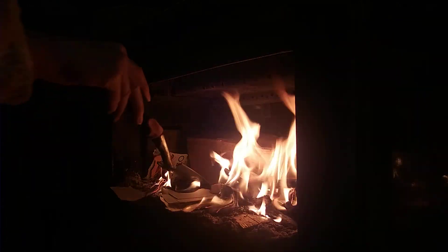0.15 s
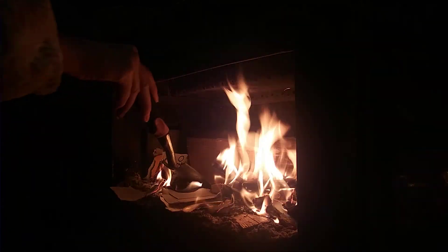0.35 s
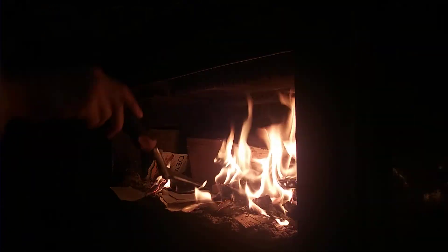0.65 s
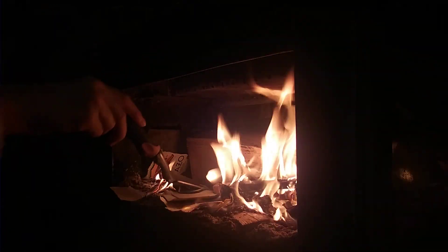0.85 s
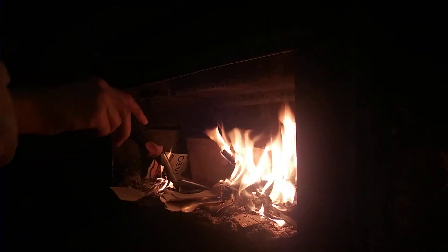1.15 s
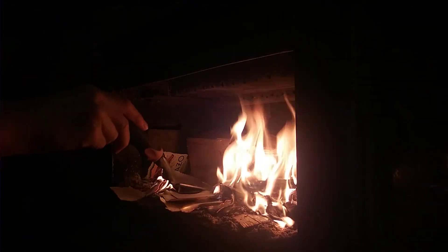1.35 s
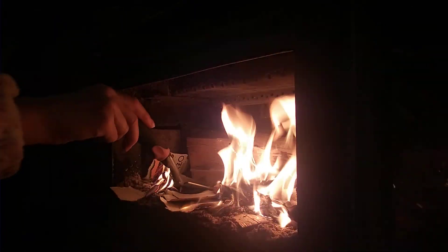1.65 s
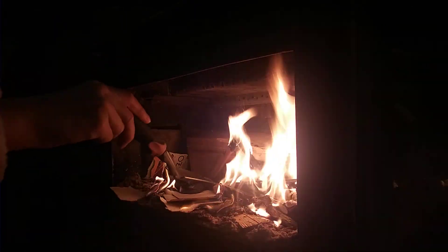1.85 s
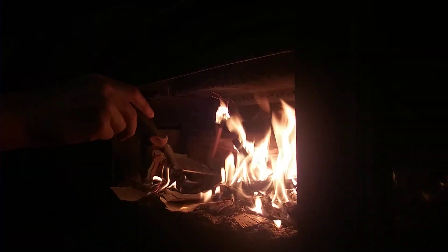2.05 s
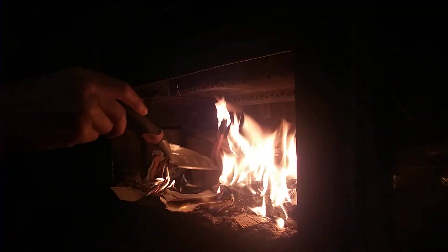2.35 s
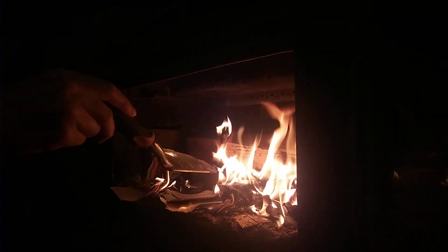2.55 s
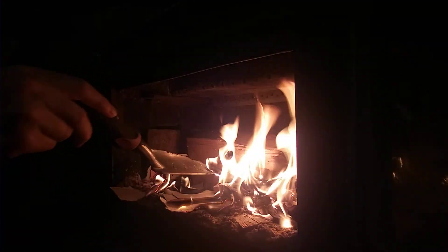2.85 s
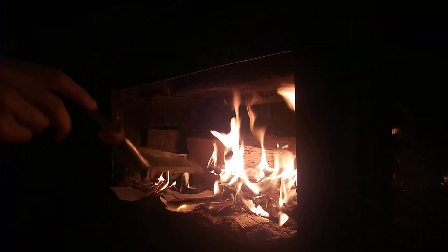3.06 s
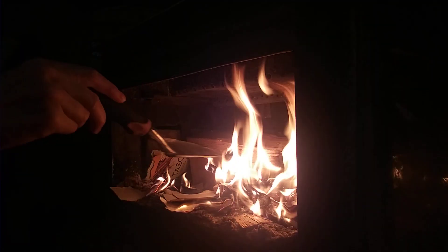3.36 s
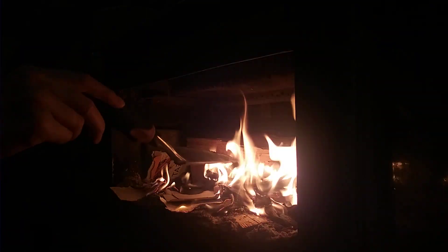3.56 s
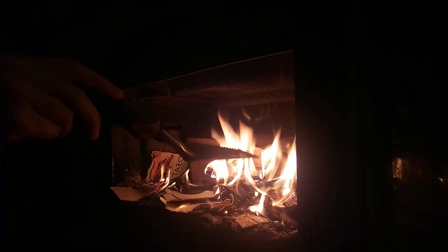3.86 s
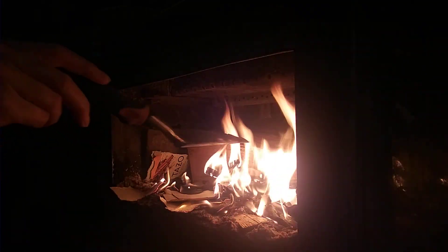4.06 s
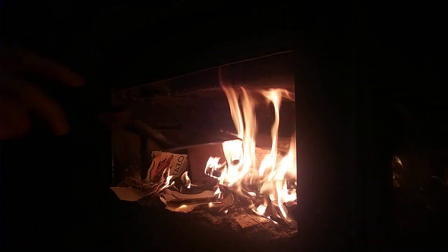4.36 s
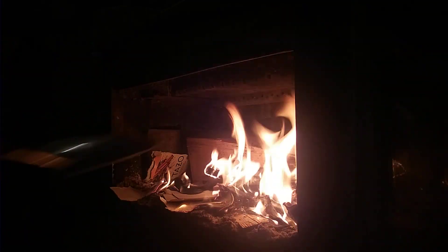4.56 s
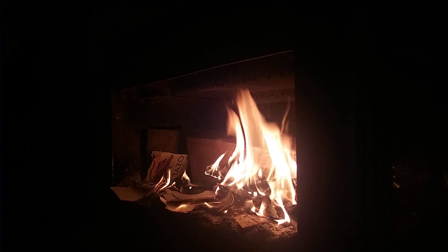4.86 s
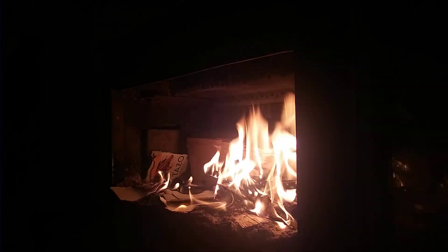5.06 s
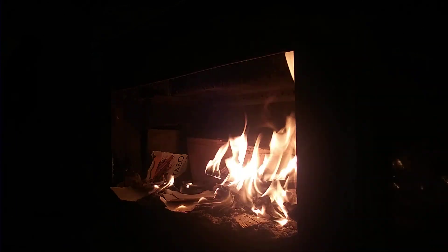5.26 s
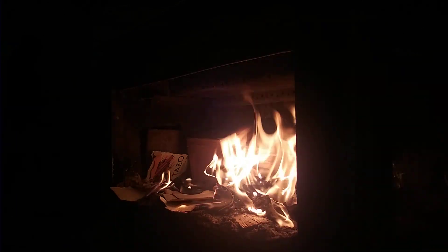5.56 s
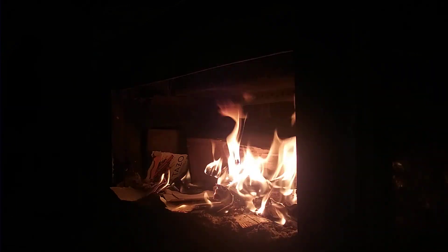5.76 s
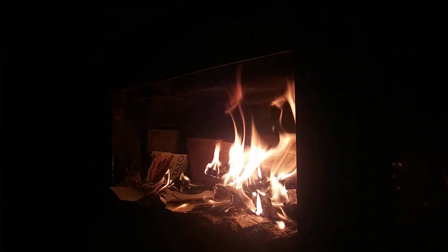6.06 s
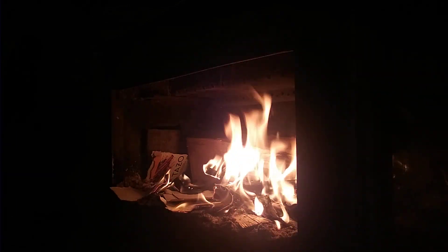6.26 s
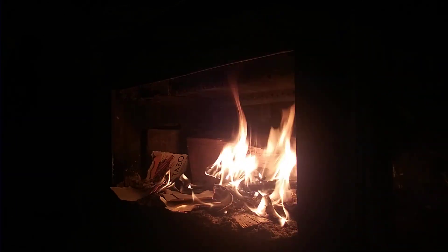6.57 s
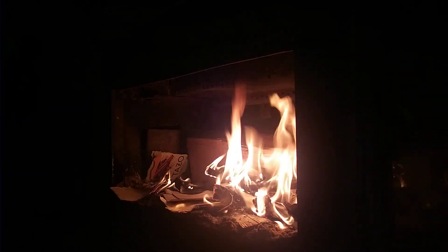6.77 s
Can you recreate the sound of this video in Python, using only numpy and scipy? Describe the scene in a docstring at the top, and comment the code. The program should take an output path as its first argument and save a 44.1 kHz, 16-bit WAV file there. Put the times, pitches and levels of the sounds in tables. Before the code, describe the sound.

A small paper fire murmurs and pops in an open wood stove. A steel shovel scrapes and crunches through paper and ash, its blade faintly singing, and knocks once on the iron door frame. It is then dropped on sheet metal with a loud clatter and boom, and its wooden handle rocks to rest. Kindling rustles at the end. The sound is close and bright, in a small room.

```python
"""Soft pops and papery scraping, then a loud metal clatter and boom, close by in a small room.
A small paper fire draws and pops in an open wood stove. A steel shovel pushes through paper and ash,
its blade singing with friction. It knocks the iron door frame, is dropped on sheet metal, and its
handle rocks to rest. Kindling is picked up at the end. The microphone has a bright treble peak."""
import sys
import numpy as np
from scipy import signal
from scipy.fft import rfft, irfft
from scipy.io import wavfile

SR = 44100
rng = np.random.default_rng(int(sys.argv[2]) if len(sys.argv) > 2 else 0)


def master_out(mix):
    """Clip the mix to full scale and print it as 16-bit PCM to the path in sys.argv[1]."""
    frames = np.transpose(np.atleast_2d(mix))
    ceiling = np.clip(frames, -1, 1)
    pcm = np.round(ceiling * 32767).astype(np.int16)
    wavfile.write(sys.argv[1], SR, pcm)


N = 305613
T = np.arange(N) / SR

# spectrum of a hard contact: f/Hz, level/dB
CLASH_SPECTRUM = [(60, -31.5), (150, -10.5), (280, -0.5), (600, 1), (1000, -4.5), (2000, -1.5), (4000, -4),
                  (6000, -5.5), (7500, -12.5), (11000, -12.5), (12500, -21), (16000, -28.5)]


def amp(db):
    """Decibels to gain."""
    return 10 ** (np.asarray(db) / 20)


def unit(x):
    """Scale to rms 1."""
    return x / np.sqrt(np.mean(x ** 2))


def fade(t, t60_s):
    """Exponential decay, 60 dB down after t60_s."""
    return np.exp(-np.minimum(np.log(1000) * t / t60_s, 20))


def add(out, start_s, x):
    """Mix x into out from start_s on."""
    i = max(int(start_s * SR), 0)
    out[i:i + len(x)] += x[:len(out) - i]


def colour(x, spectrum, tilt_db_oct=0):
    """Shape x with a spectrum (f/Hz, level/dB), tilted about 2 kHz."""
    hz, db = np.transpose(spectrum)
    octave = np.log2(np.maximum(np.fft.rfftfreq(len(x), 1 / SR), 1) / 2000)
    gain_db = np.interp(octave, np.log2(hz / 2000), db) + tilt_db_oct * octave
    return irfft(rfft(x) * amp(gain_db), len(x))


def band(x, lo_hz, hi_hz, order=2):
    """Causal band-pass."""
    sos = signal.butter(order, [lo_hz, hi_hz], "band", fs=SR, output="sos")
    return signal.sosfilt(sos, x + 1e-18)


def resonance(x, hz, width_hz):
    """One resonance, gain 1 at its centre."""
    return signal.lfilter(*signal.iirpeak(hz, hz / width_hz, fs=SR), x + 1e-18)


def walk(rate_hz):
    """Random wandering, spread near 1."""
    knots = rng.standard_normal(N // 20)
    return np.interp(T * rate_hz, np.arange(len(knots)), knots)


def crackle(rate_hz, spread_db):
    """Random clicks, most weak, a few strong; count capped at N / 8."""
    count = min(int(rate_hz * N / SR), N // 8)
    when, chance, side = rng.random((N // 8, 3))[:count].T
    size = amp(spread_db * np.minimum(-np.log(1 - chance), 3.5))
    return unit(np.bincount((when * N).astype(int), size * np.sign(side - .5), N))


def tick():
    """Instant of hard contact, peak 1."""
    click = band(signal.unit_impulse(SR // 50), 900, 5100, order=1)
    return click / abs(click).max()


def ring(modes, freedom=1):
    """Modes of a struck body, alternating in sign; pressed on another (freedom < 1) it dies sooner."""
    t = T[:3 * SR // 2]
    swing = sum((-1) ** k * amp(db) * fade(t, t60_s * freedom) * np.sin(2 * np.pi * hz * t)
                for k, (hz, db, t60_s) in enumerate(modes))
    return band(swing, 100, 20000)  # small bodies radiate no deep bass


def wash(spectrum, t60_s, damping, tilt_db_oct=0, buzz_db=0):
    """Dense weak modes as noise, grainy where metal buzzes; t60_s holds at 1 kHz, treble dies sooner."""
    chatter = rng.standard_normal(SR) * amp(buzz_db * walk(900)[:SR])
    bins = rfft(unit(colour(chatter, spectrum, tilt_db_oct)))
    octave = np.log2(np.clip(np.fft.rfftfreq(SR, 1 / SR), 125, 16000) / 1000)
    out = np.zeros(SR)
    for k in range(-3, 5):
        octave_band = irfft(bins * np.maximum(1 - abs(octave - k), 0), SR)
        out += octave_band * fade(T[:SR], t60_s / 2 ** (k * damping))
    return out


def fractures(breaks, grit_db, shower_db, low_db, middle_db):
    """Each break: one sharp crack and a fading shower of smaller ones, weighted in three bands."""
    out, t = np.zeros(N), T[:SR // 4]
    for start_s, db, body_db, t60_s in breaks:
        noise, grit = rng.standard_normal((2, len(t)))
        shower = noise * amp(grit_db * np.minimum(grit, 2)) * fade(t, t60_s)
        shower *= amp(shower_db) / np.linalg.norm(shower)
        shower[0] = 1  # the crack
        parts = band(shower, 205, 2660), band(shower, 1840, 7740), band(shower, 7300, 13340, order=1)
        gains = amp([body_db + low_db, body_db + middle_db, 0])
        snap = sum(gain * part / np.linalg.norm(part) for gain, part in zip(gains, parts))
        add(out, start_s, amp(db) * snap)
    return out


def effort(moves, grip_s=0.0099, release_t60_s=0.15):
    """Each movement takes hold, presses steadily harder or softer, and dies away as the hand stops."""
    out = np.zeros(N)
    for start_s, end_s, db, swell_db in moves:
        progress = np.clip((T - start_s) / (end_s - start_s), 0, 1)
        attack = np.clip((T - start_s) / grip_s, 0, 1)
        release = fade(np.maximum(T - end_s, 0), release_t60_s)
        out += amp(db + swell_db * (progress - .5)) * attack * release
    return out


def friction(resonances, density, jerk_db, shift_db, body_db):
    """Uneven grains, each size with its own pitch; resonances come and go as the contact moves."""
    # rubbed paper: f/Hz, level/dB
    paper_spectrum = [(150, -16), (500, 13), (800, -2.5), (1250, -3), (2200, 0.5), (4500, 3.5), (6500, 1),
                      (8000, -6.5), (11000, 1), (13000, -6), (16000, -4)]
    crumbs = np.zeros(N)
    for hz in np.geomspace(900, 15000, 22):
        clicks = crackle(density * hz / 60000, spread_db=4)
        crumbs += resonance(clicks, hz, hz / 14) * amp(3.5 * walk(35))
    grains = crackle(density, spread_db=4.5) + amp(1) * unit(crumbs)
    grains *= amp(jerk_db * walk(130))
    body = sum(amp(db + shift_db * walk(30)) * unit(resonance(grains, hz, 2 * half_width_hz))
               for hz, half_width_hz, db in resonances)
    return unit(unit(colour(grains, paper_spectrum)) + amp(body_db) * unit(body))


def room(x):
    """Quick firebox reflections, then the faint tail of a small room."""
    # firebox wall echoes: delay/s, level/dB
    walls = [(.0013, -27), (.0024, -23.5), (.0034, -19.5), (.0046, -23.5), (.0059, -23)]
    t = T[:SR // 2]
    tail = rng.standard_normal(len(t)) * (t > .004) * np.exp(-t / 0.035)
    echoes = amp(-13) * tail / np.linalg.norm(tail)
    for delay_s, db in walls:
        echoes[int(delay_s * SR)] += amp(db)
    echoes = band(echoes, 1200, 19000)  # the open firebox returns little bass
    return x + signal.fftconvolve(x, echoes)[:N]


def draught():
    """Air drawn through the firebox murmurs."""
    # air noise: f/Hz, level/dB
    spectrum = [(22, -86), (48, -44.5), (100, -33.5), (138, -26), (180, -34), (270, -40.5), (400, -39),
                (700, -47.5), (1100, -53.5), (2500, -59.5), (7000, -66), (15000, -70)]
    return colour(rng.standard_normal(N), spectrum) * amp(0.3 * walk(2.56))


def fire():
    """Burning paper: fine crackle and single pops, which set the microphone's treble resonance ringing."""
    # pops: t/s, level/dB, body re treble/dB, shower t60/s
    bursts = [(0.0589, -14.5, -14, 0.014), (0.2160, 2.5, -25.5, 0.0063), (1.1032, -5, -24, 0.0059),
              (1.4708, -13, -12.5, .009), (2.1357, -18, -24, 0.0076), (2.1655, -11, -23, 0.04),
              (3.2262, -8, -16, 0.02), (3.2287, -12.5, -16.5, 0.014), (4.1134, -36.5, -12, 0.016),
              (4.3335, -30.5, -15.5, 0.013), (4.4567, -17.5, -11, 0.014), (4.8752, -25.5, -16.5, 0.0097),
              (6.0397, -24.5, -8, .016), (6.105, -20, -5, 0.0057), (6.6098, -26, -11, 0.0091)]
    ticks = amp(-71) * band(crackle(rate_hz=50, spread_db=4), 2000, 16000)
    pops = amp(4) * fractures(bursts, grit_db=-2, shower_db=-2, low_db=8.5, middle_db=12.5)
    mic_ring = amp(-4.5) * resonance(pops, hz=10080, width_hz=400)
    return ticks + pops + mic_ring


def bumps():
    """Things being moved bump dully."""
    # bumps: t/s, level/dB, tilt/(dB/oct)
    hits = [(1.712, -39.5, 1), (1.75, -41, 2.5), (2.744, -53, 0), (3.822, -41, 0.5), (4.991, -44.5, 1),
            (5.279, -55.5, 0.5), (6.561, -41.5, -1.5)]
    # dull contact: f/Hz, level/dB
    spectrum = [(60, -39), (200, 5.5), (700, 3.5), (1500, -0.5), (3000, -9.5), (6000, -15), (8000, -28.5),
                (16000, -22)]
    out = np.zeros(N)
    for start_s, db, tilt_db_oct in hits:
        add(out, start_s, amp(db) * wash(spectrum, t60_s=0.22, damping=0.18, tilt_db_oct=tilt_db_oct))
    return out


def prods(t60_s=0.042):
    """Loose wood, prodded by the blade, gives one hollow note."""
    # wood notes: t/s, f/Hz, level/dB
    notes = [(.438, 150, -32), (.738, 570, -39), (.863, 602, -37), (1.757, 780, -32)]
    out = np.zeros(N)
    for start_s, hz, db in notes:
        add(out, start_s, ring([(hz, db, t60_s)]))
    return out


def kindling():
    """Sticks slide over sticks."""
    # slides: start/s, end/s, level/dB, swell/dB
    slides = [(6.43, 6.46, -58.5, 0), (6.515, 6.59, -52.5, -4), (6.66, 6.76, -51.5, -10),
              (6.77, 6.87, -46, 2.5)]
    # stick resonances: f/Hz, half-width/Hz, level/dB
    sticks = [(1265, 67, 10), (1990, 73, 1.5), (2640, 35, -5), (3450, 98, 4), (4430, 140, -15),
              (4920, 157, -18)]
    return effort(slides) * friction(sticks, density=7800, jerk_db=3.5, shift_db=3, body_db=-2)


def scraping():
    """Paper and ash crumble under the pushed blade."""
    # pushes: start/s, end/s, level/dB, swell/dB
    pushes = [(.13, .41, -58.5, 8), (.57, .85, -53, 15.5), (.87, 1.36, -50, -3.5), (1.42, 1.65, -49.5, 0),
              (1.73, 2.19, -42, -0.5), (2.2, 2.62, -52, -13.5), (2.67, 2.8, -56, 6), (3.42, 3.55, -56, -1),
              (3.56, 3.69, -52, -9)]
    # scraped blade resonances: f/Hz, half-width/Hz, level/dB
    blade = [(2880, 37, 2), (3430, 80, 4), (4890, 300, 5), (5840, 120, -4), (7000, 160, 6), (8200, 30, -3),
             (9130, 220, 11.5)]
    ash = friction(blade, density=3000, jerk_db=3.5, shift_db=9, body_db=-7.5)
    return amp(-2.5) * effort(pushes) * ash


def crunches():
    """Paper and twigs give way."""
    # breaks: t/s, level/dB, body re treble/dB, shower t60/s
    breaks = [(0.485, -21, -3.5, 0.19), (0.8385, -26, -18, 0.03), (0.889, -26, -15, 0.016),
              (1.166, -26.5, -6, 0.03), (1.7515, -20.5, -2, .04), (1.872, -22, -2.5, 0.099),
              (1.948, -21, -10, 0.066), (2.011, -16, -28, 0.12), (2.305, -29, 2.5, 0.028),
              (2.3445, -25, -17, 0.033), (2.393, -27.5, -3.5, .05), (2.484, -26, -3, .039),
              (2.554, -28, -5, .03), (6.546, -26, -28, .089), (6.6638, -29.5, 2.5, .038),
              (6.813, -18, -0.5, .028)]
    return amp(5.5) * fractures(breaks, grit_db=-1.5, shower_db=14, low_db=-1, middle_db=5)


def singing(overtones_db=-61):
    """Friction keeps the blade's high modes ringing; the leading one locks into a thin, wavering tone."""
    # blade overtones: f/Hz, width/Hz, level/dB
    modes = [(3350, 80, -12.5), (4970, 50, -10.5), (6950, 70, -9.5), (8220, 50, -9.5), (11150, 70, -7.5),
             (14600, 120, -11.5)]
    # singing strokes: start/s, end/s, leading mode f/Hz, its level/dB
    strokes = [(0.097, 0.328, 4970, -63), (0.342, 0.443, 4970, -57.5), (1.48, 1.68, 8220, -60),
               (1.634, 1.64, 2550, -39.5), (1.642, 1.662, 3780, -44), (2.563, 2.684, 4970, -59.5),
               (2.654, 2.775, 4970, -67), (3.446, 3.51, 8200, -56)]
    rub = rng.standard_normal(N)
    overtones = sum(amp(db + 2 * walk(11)) * unit(resonance(rub, hz, width_hz))
                    for hz, width_hz, db in modes)
    wavering_s = np.cumsum(1 + .003 * walk(60)) / SR
    grip = amp(4.4 * walk(53.4))
    out = np.zeros(N)
    for start_s, end_s, hz, db in strokes:
        span = (T > start_s) & (T < end_s)
        pressure = np.sin(np.pi * (T[span] - start_s) / (end_s - start_s))
        tone = amp(db) * grip[span] * np.sin(2 * np.pi * hz * wavering_s[span])
        out[span] += pressure * (amp(overtones_db) * overtones[span] + tone)
    return out


def frame_knock(start_s=3.4015):
    """The blade strikes the iron door frame, which rings briefly."""
    # frame modes: f/Hz, level/dB, t60/s
    modes = [(512, -3.5, 0.15), (1150, -21.5, 0.27), (1516, -13, 0.1), (1970, -25, 0.13), (2420, -3, 0.056),
             (3000, -8, 0.064), (3280, -16, 0.13), (3876, -11, 0.082), (4380, -9.5, 0.065),
             (6700, -10, 0.049)]
    clash = wash(CLASH_SPECTRUM, t60_s=0.13, damping=0.43, tilt_db_oct=2.2, buzz_db=3)
    out = np.zeros(N)
    add(out, start_s, amp(-25.5) * ring(modes))
    add(out, start_s, amp(-28.5) * clash)
    return out


def wood_knocks():
    """Dry knocks, each on another spot and brighter the harder it falls."""
    # handle rocking to rest, last row a stick: t/s, level/dB
    knocks = [(5.8856, -10), (5.926, -23.5), (5.933, -25.5), (5.963, -26.5), (5.971, -31.5), (5.984, -29),
              (6.007, -30.5), (6.084, -42), (6.8115, -37.5)]
    # wooden handle modes: f/Hz, level/dB, t60/s
    modes = [(1047, -5, 0.03), (1280, 6.5, 0.022), (1444, -2.5, 0.029), (1646, 0, 0.045), (1913, -1, 0.027),
             (2213, -13, 0.06), (3055, -8.5, 0.015), (4320, -16, 0.06)]
    out = np.zeros(N)
    for start_s, db in knocks:
        contact = wash(CLASH_SPECTRUM, t60_s=0.027, damping=0.16, tilt_db_oct=2 + 0.021 * db)
        handle = ring([(hz, mode_db + 3 * rng.standard_normal(), t60_s) for hz, mode_db, t60_s in modes])
        add(out, start_s, amp(db - 4) * handle)
        add(out, start_s, amp(db - 10) * contact)
        add(out, start_s, amp(db - 24) * tick())
    return out


def shovel_drop():
    """The shovel clatters onto sheet metal: the blade rings, the sheet booms on."""
    # landings: t/s, boom/dB, blade/dB, blade freedom/0-1, clash/dB, tilt/(dB/oct), clash t60/s, tick/dB
    blows = [(5.334, -43.5, -26, 1, -17, 1, 0.18, -1.5), (5.414, -18, -44, 0.8, -11.5, -0.06, 0.49, -5.5),
             (5.4898, -30.5, -24, 0.67, -14.5, 4, 0.2, 3), (5.628, -60.5, -56, 0, -27.5, -3, 0.1, -37),
             (5.713, -44, -42.5, 0.27, -45, -1.5, 0.69, -36)]
    # sheet metal modes: f/Hz, level/dB, t60/s
    sheet_modes = [(140.4, -8, 2.12), (215, -8, 0.45), (264, 0, 0.62), (326, -3.5, 1.44),
                   (394, -16.5, 0.91), (493, -2, 0.68), (529.6, -4.5, 0.81), (597, -1.5, 0.44),
                   (732, -6.5, 0.41), (740, -6, 0.49), (872.2, -1, 0.33), (950, -10, 0.33),
                   (1029, -3.5, 0.35), (1080, -12.5, 0.98), (1112, -3, 0.56), (1286, -20, 1.9),
                   (1410, -9, 0.49), (1500, -10.5, 0.33), (1510, -11.5, 0.52), (1599, -5.5, .27),
                   (1674, -21, .6), (1717, -8, .2), (1860, -25, .75), (1990, -13, .45), (2040, -11, .2),
                   (2930, -10.5, 0.21), (3600, -30, .3), (5000, -24, 0.33), (6200, -25, 0.43)]
    # free blade modes: f/Hz, level/dB, t60/s
    blade_modes = [(531, 1, 0.19), (690, -28, 0.38), (1080, 1, 0.26), (1295, 4, 0.21), (2240, -17, 0.16),
                   (3240, -22, 0.55), (4300, -8.5, 0.21), (5350, -25, 0.16), (5647, -13, 0.15),
                   (6130, -7, 0.14), (7000, -17.5, 0.15), (8330, -7, 0.15), (9711, -22, 0.13),
                   (10850, -12, 0.11), (10600, -29, 0.13), (11180, -10, 0.17)]
    out, boom = np.zeros(N), ring(sheet_modes)
    for start_s, boom_db, blade_db, freedom, clash_db, tilt_db_oct, t60_s, tick_db in blows:
        clash = wash(CLASH_SPECTRUM, t60_s, damping=0.38, tilt_db_oct=tilt_db_oct, buzz_db=4)
        add(out, start_s, amp(boom_db) * boom)
        add(out, start_s, amp(blade_db) * ring(blade_modes, max(freedom, .1)))
        add(out, start_s, amp(clash_db) * clash)
        add(out, start_s, amp(tick_db) * tick())
    return out


def scene():
    """All sources in one small room, mono."""
    stove = draught() + fire()
    stirring = scraping() + kindling() + crunches() + singing()
    impacts = frame_knock() + shovel_drop() + wood_knocks() + bumps() + prods()
    return room(stove + stirring + impacts)[None]


def record(dry):
    """The microphone port rings in the treble; the loudest peaks are rounded and the top is cut."""
    ceiling, top_hz = .85, 16100
    bright = dry + amp(8.5) * resonance(dry, hz=10250, width_hz=975)
    rounded = ceiling * np.tanh(bright / ceiling)
    return signal.sosfilt(signal.ellip(8, .2, 70, top_hz, fs=SR, output="sos"), rounded)


dry = scene()
out = record(dry)
master_out(out)
```